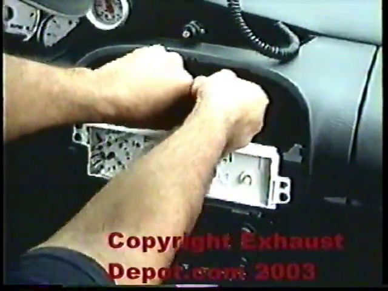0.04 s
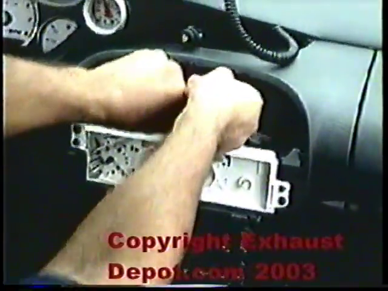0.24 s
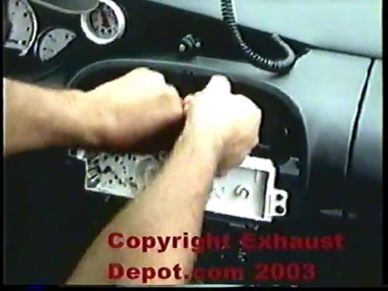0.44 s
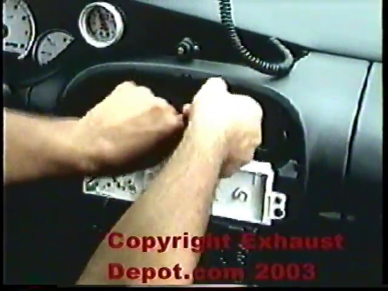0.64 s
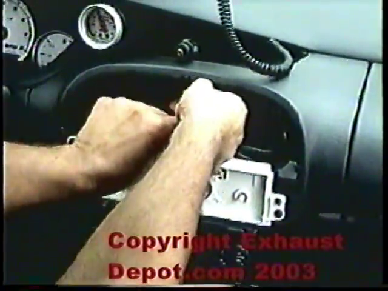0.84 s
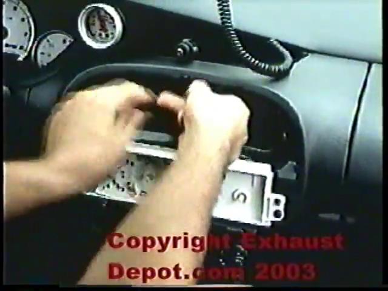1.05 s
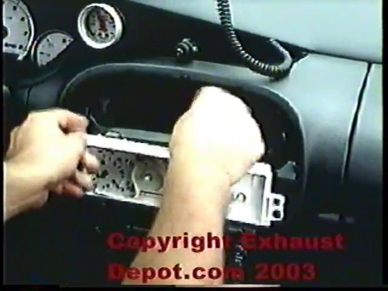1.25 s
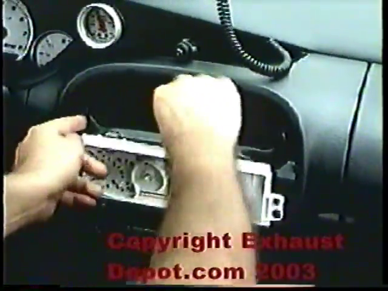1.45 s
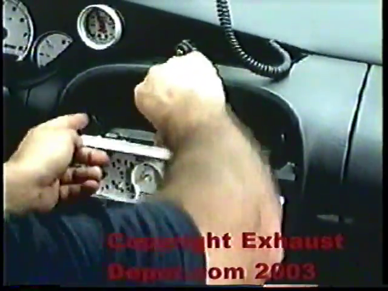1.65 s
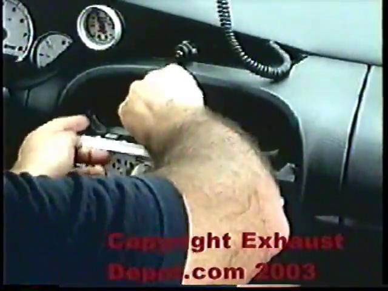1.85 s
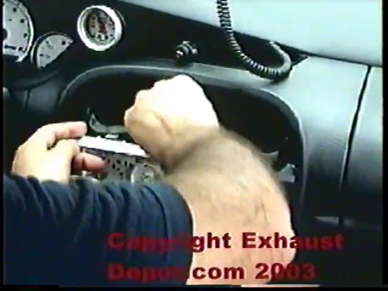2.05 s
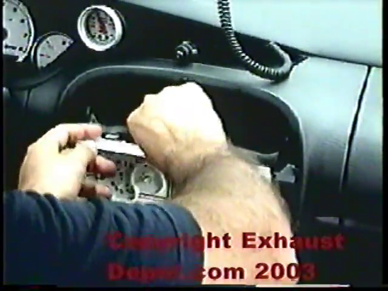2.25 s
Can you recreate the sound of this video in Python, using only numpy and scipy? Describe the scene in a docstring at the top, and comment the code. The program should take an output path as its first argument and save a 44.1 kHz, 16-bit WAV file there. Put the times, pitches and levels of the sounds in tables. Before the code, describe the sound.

Plastic trim creaks and snaps off a car dashboard, followed by a few hollow knocks.

```python
"""Prying off dashboard trim

Hands pry a plastic trim panel off a car dashboard. Its clips creak, snap free and rattle, each contact
ringing clip, panel and hollow dashboard; later the loose housing is knocked and creaks in its seat.
The cabin is dead, with a bed of low rumble and hiss. The close microphone overloads on the big snap
and feeds the right channel only."""
import sys
import numpy as np
from scipy import signal
from scipy.fft import rfft, irfft
from scipy.io import wavfile

SR = 44100
rng = np.random.default_rng(int(sys.argv[2]) if len(sys.argv) > 2 else 0)


def bounce(signal):
    """Save signal as a 16-bit WAV file at the path given by the first command-line argument."""
    frames = np.transpose(np.atleast_2d(signal))
    limited = np.clip(frames, -1, 1)
    pcm = np.round(limited * 32767).astype(np.int16)
    wavfile.write(sys.argv[1], SR, pcm)


N = 101429

# Cabin rumble and hiss, with a thin whine on top. Each row: frequency in Hz, level in dB per Hz.
BED_COLOUR = [(20, -26), (35, -14), (58, 0), (96, 0), (260, -12.5), (450, -16), (895, -17.5), (1300, -24.5),
              (3000, -37.7), (6900, -40), (7250, -29.5), (7600, -41), (16000, -50.5)]
# Steady hum. Each row: pitch in Hz, level in dB.
HUM = [(91.5, -45)]
# Trim snaps. Each row: start in seconds, then dashboard, panel and clip levels in dB.
SNAPS = [(.0705, -20, -29, -41), (.199, -26, -21, -13), (.2045, -27, -23, -18), (.223, -23, -28, -36),
         (.256, -29, -30, -39), (.3093, -30, -33, -31), (.332, -26, -28, -21), (.3345, -24, -14, -9),
         (.340, -17, -5, -11), (.351, -1, -6, -21), (.360, -4, -14, -22), (.3833, -3, -8, -21),
         (.391, -5, -11, -18), (.401, -11, -24, -31), (.417, -23, -26, -29), (.5135, -21, -26, -29),
         (.530, -27, -33, -38), (.6305, -16, -28, -39)]
# Dull dashboard thumps. Each row: start in seconds, pitch in Hz, level in dB.
THUMPS = [(.071, 212, -20), (.205, 310, -25), (.232, 175, -24), (.262, 140, -26), (.312, 200, -25),
          (.348, 180, -13), (.388, 180, -15), (.53, 160, -24), (.632, 208, -25), (1.893, 172, -14),
          (1.901, 285, -15), (1.930, 212, -18), (2.025, 200, -29), (2.153, 165, -22), (2.168, 235, -29)]
# Plastic on plastic. Each row: start and length in seconds, swell in dB, then dashboard,
# panel or housing, and clip levels in dB.
RUBS = [(.215, .052, -9, -28, -28, -40), (.35, .08, -16, -20, -23, -27), (.80, .04, 3, -38, -47, -55),
        (1.04, .05, 8, -41, -44, -47), (1.613, .035, -3, -44, -45, -48), (1.855, .048, 19, -23, -23, -28),
        (1.932, .035, -11, -18, -30, -41)]
# Small tabs and edges. Each row: start in seconds, pitch in Hz, level in dB, t60 in seconds.
PINGS = [(.221, 1000, -19.5, .07), (.632, 1200, -26, .05), (1.457, 3704, -43, .05), (1.715, 2620, -36, .05),
         (2.152, 1500, -36, .06)]
# Knocks on the housing. Each row: start in seconds, then dashboard, housing and clip levels in dB.
KNOCKS = [(1.0894, -23, -38, -35), (1.175, -31, -33, -35.5), (1.7135, -41, -40, -38),
          (1.842, -29, -42, -45), (1.882, -28, -27, -28), (1.891, -13, -16, -30), (1.899, -10.5, -26, -28),
          (1.926, -12, -15, -30), (1.950, -27, -34, -34), (2.018, -32, -42, -57), (2.152, -31, -39, -48)]
# The clear notes of each part. Each row: pitch in Hz, level in dB, t60 in seconds.
DASH_MODES = [(360, 0, .09), (412, -2, .07), (470, -7, .07), (645, -7, .07)]
PANEL_MODES = [(716, -3, .08), (1070, -7, .06), (1155, 0, .07), (1260, -6, .06), (1590, -8, .07)]
CLIP_MODES = [(2880, -3, .035), (4300, -3, .035), (5700, -2, .04), (6150, 0, .04), (6620, -2, .04)]
HOUSING_MODES = [(700, -3, .08), (995, -2, .06), (1785, -1, .055), (1975, -4, .055)]
SEAT_MODES = [(392, 4, .04), (718, 4, .06), (1165, -2, .04), (1782, -1, .045)]
# The dense resonances between those notes; panel and housing share the plastic colour.
# Each row: frequency in Hz, level in dB per Hz.
DASH_COLOUR = [(70, -16), (200, -7), (390, 0), (580, -8), (900, -23), (2000, -50)]
PLASTIC_COLOUR = [(250, -28), (600, -5), (1250, 0), (1800, -8), (2400, -17), (5000, -36)]
CLIP_COLOUR = [(700, -22), (1700, 1), (2800, 1), (4800, -3), (6200, 1.5), (8500, -8), (11500, -14),
               (16000, -15)]
BOOM_COLOUR = [(25, -8), (70, -9), (180, 0), (280, -3), (600, -35)]
# Each voice: attack and t60 of the dense ring in seconds, then modes and cabin tail in dB against it.
DASH_VOICE = (.0012, .044, 2, -26)
PLASTIC_VOICE = (.0014, .042, -3, -29)
CLIP_VOICE = (.0013, .04, -9, -32)
BOOM_VOICE = (.002, .09, -3, -24)

RING_S, LEVEL_WINDOW_S, CABIN_T60_S = .4, .01, .22
HARD_BLOW_DB, LIGHT_SHARPEN = -5, .085  # softer blows raise the dashboard's modes by up to this share
PANEL_FREE_S = .7  # from here on the hands work on the housing


def undb(db):
    """Decibels to gain."""
    return 10 ** (np.asarray(db) / 20)


def fade(t, t60):
    """Exponential decay, 60 dB down after t60."""
    return np.exp(-np.log(1000) * t / t60)


def noise(colour, size):
    """Noise at rms 1, shaped by (Hz, dB) points and silent above the last."""
    hz, db = np.array(colour, float).T
    f = np.maximum(np.fft.rfftfreq(size, 1 / SR), 1)
    gain = undb(np.interp(np.log(f), np.log(hz), db)) * (f < hz[-1])
    x = irfft(rfft(rng.standard_normal(size)) * gain, size)
    return x / np.sqrt(np.mean(x ** 2) + 1e-18)


def add(out, start, x):
    """Mix x in at a time in seconds."""
    i = int(start * SR)
    out[i:i + len(x)] += x[:len(out) - i]


def tones(modes, pitch=1, scatter=.005):
    """Modes ring as decaying sines of alternating polarity, slightly detuned each time."""
    t = np.arange(int(RING_S * SR)) / SR
    out = np.zeros(len(t))
    for k, (hz, db, t60) in enumerate(modes):
        tuned_hz = hz * pitch * (1 + scatter * rng.standard_normal())
        out += (-1) ** k * undb(db) * np.sin(2 * np.pi * tuned_hz * t) * fade(t, t60)
    return out


def ring(modes, colour, voice, pitch=1):
    """One blow on a part: clear modes, dense resonances and the cabin's short tail."""
    attack, t60, modes_db, cabin_db = voice
    t = np.arange(int(RING_S * SR)) / SR
    head = int(LEVEL_WINDOW_S * SR)
    clear = tones(modes, pitch)
    dense = noise(colour, len(t)) * fade(t, t60)
    body = undb(modes_db) * clear / clear[:head].std() + dense / dense[:head].std()
    body *= 1 - np.exp(-t / attack)
    tail = noise(colour, len(t)) * fade(t, CABIN_T60_S) * (1 - np.exp(-t / LEVEL_WINDOW_S))
    return body / body[:head].std() + undb(cabin_db) * tail


def parts(plastic_modes, blow_db):
    """Fresh rings of dashboard, plastic piece and clip, as every contact lands on another spot."""
    # The dashboard gives under hard blows and rings higher under light ones.
    lightness = max(1 - undb(blow_db - HARD_BLOW_DB), 0)
    return [ring(DASH_MODES, DASH_COLOUR, DASH_VOICE, pitch=1 + LIGHT_SHARPEN * lightness),
            ring(plastic_modes, PLASTIC_COLOUR, PLASTIC_VOICE),
            ring(CLIP_MODES, CLIP_COLOUR, CLIP_VOICE)]


def strikes(hits, plastic_modes):
    """Each hit rings all three parts at once, in its own balance."""
    out = np.zeros(N)
    for start, *levels in hits:
        for db, part in zip(levels, parts(plastic_modes, blow_db=levels[0])):
            add(out, start, undb(db) * part)
    return out


def driven(slips, part):
    """A part rung by a run of slips, with the energy of rms 1 over the length of the run."""
    x = signal.fftconvolve(slips, part)
    return x / np.sqrt(np.sum(x ** 2) / len(slips) + 1e-18)


def cabin_bed(level_db=-33.5, waver_db=.8):
    """Gently wavering rumble, hiss and whine over a faint steady hum."""
    t = np.arange(N) / SR
    waver = noise([(1, 0), (8, 0), (30, -60)], N)
    hum = sum(np.sqrt(2) * undb(db) * np.sin(2 * np.pi * (hz * t + rng.random())) for hz, db in HUM)
    return undb(level_db + waver_db * waver) * noise(BED_COLOUR, N) + hum


def trim_snaps():
    """Clips let go with a bright crack and the panel rattles on the dashboard."""
    return strikes(SNAPS, PANEL_MODES)


def dashboard_thumps(t60=.12):
    """The hollow dashboard booms when the load on it changes, each spot at its own pitch."""
    out = np.zeros(N)
    for start, hz, db in THUMPS:
        add(out, start, undb(db) * ring([(hz, 0, t60)], BOOM_COLOUR, BOOM_VOICE))
    return out


def plastic_rubs(slips_per_s=700, scatter_db=4):
    """Uneven stick-slip ticks swell or fade with the pull and ring all three parts."""
    out = np.zeros(N)
    for start, length, swell_db, *levels in RUBS:
        n = int(length * SR)
        ticks = (rng.random(N) < slips_per_s / SR) * undb(scatter_db * rng.standard_normal(N))
        slips = ticks[:n] * undb(np.linspace(0, swell_db, n))
        modes = PANEL_MODES if start < PANEL_FREE_S else HOUSING_MODES
        for db, part in zip(levels, parts(modes, blow_db=levels[0])):
            add(out, start, undb(db) * driven(slips, part))
    return out


def tab_pings():
    """Small tabs and edges each ping on one note."""
    out = np.zeros(N)
    for start, *mode in PINGS:
        add(out, start, tones([mode]))
    return out


def housing_knocks():
    """The loose housing clacks against the dashboard."""
    return strikes(KNOCKS, HOUSING_MODES)


def seat_creak(start_s=1.147, length_s=.038, slip_hz=197, jitter=.02, seat_db=-26, clip_db=-41):
    """Nearly regular slips ring the housing's seat and a clip: a short pitched creak."""
    out, slips = np.zeros(N), np.zeros(int(length_s * SR))
    times = np.cumsum(1 + jitter * rng.standard_normal(slip_hz)) / slip_hz
    at = ((times - times[0]) * SR).astype(int)
    slips[at[at < len(slips)]] = 1
    add(out, start_s, undb(seat_db) * driven(slips, tones(SEAT_MODES)))
    add(out, start_s, undb(clip_db) * driven(slips, ring(CLIP_MODES, CLIP_COLOUR, CLIP_VOICE)))
    return out


def scene(idle_hiss_db=-79):
    """Everything sits hard right; the left holds only idle hiss."""
    left = undb(idle_hiss_db) * rng.standard_normal(N)
    right = cabin_bed() + trim_snaps() + dashboard_thumps() + plastic_rubs()
    right += tab_pings() + housing_knocks() + seat_creak()
    return np.array([left, right])


def record(dry, ceiling=.98, sag_gain=1.2, sag_band_hz=(8, 30), top_hz=15800):
    """The input clips flat on the loudest peaks and its bias sags for a moment; then the top is cut."""
    excess = np.maximum(np.abs(dry) - ceiling, 0)
    sag_band = signal.butter(1, sag_band_hz, "bandpass", fs=SR, output="sos")
    sag = sag_gain * signal.sosfilt(sag_band, excess)
    clipped = np.clip(dry - sag, -ceiling, ceiling)
    high_cut = signal.ellip(10, .2, 80, top_hz, fs=SR, output="sos")
    return signal.sosfilt(high_cut, clipped)


dry = scene()
out = record(dry)
bounce(out)
```